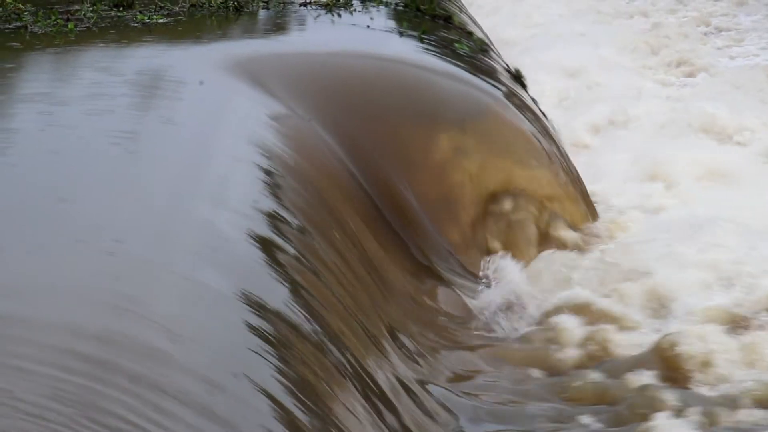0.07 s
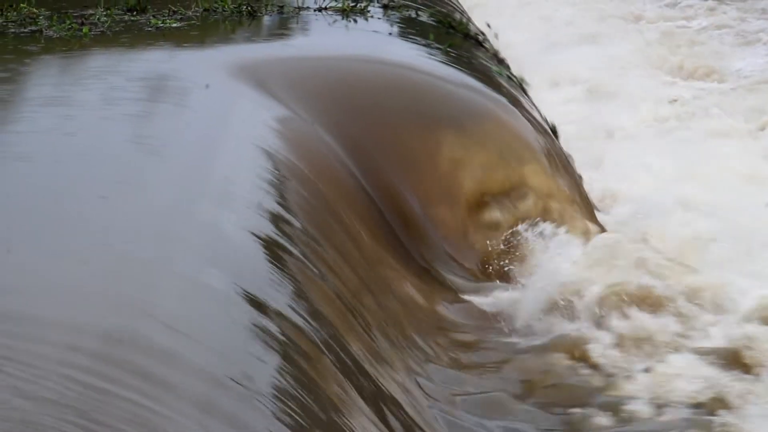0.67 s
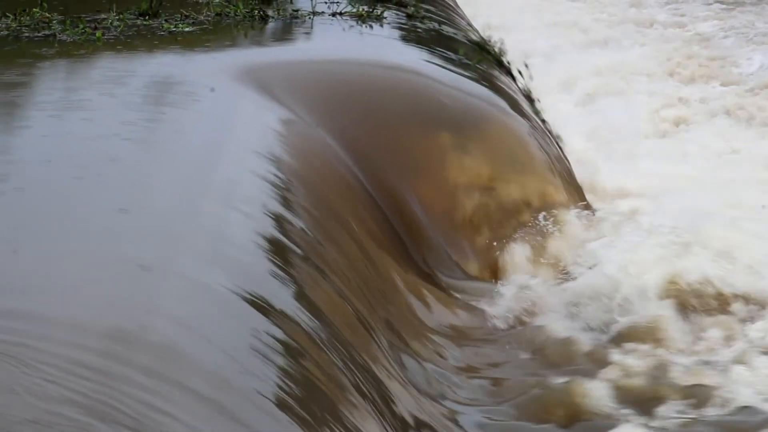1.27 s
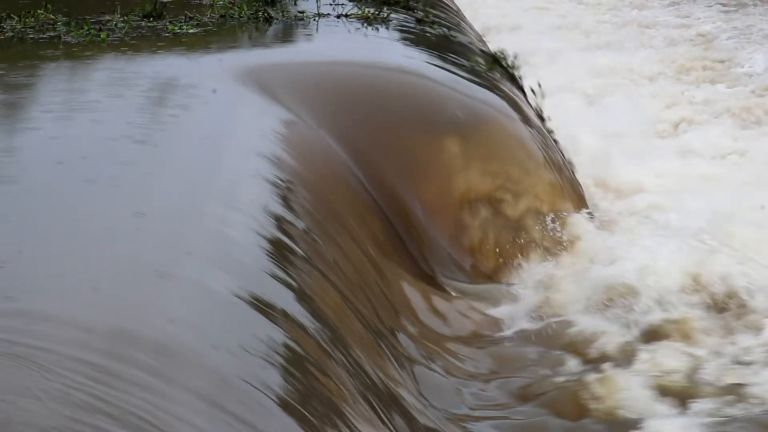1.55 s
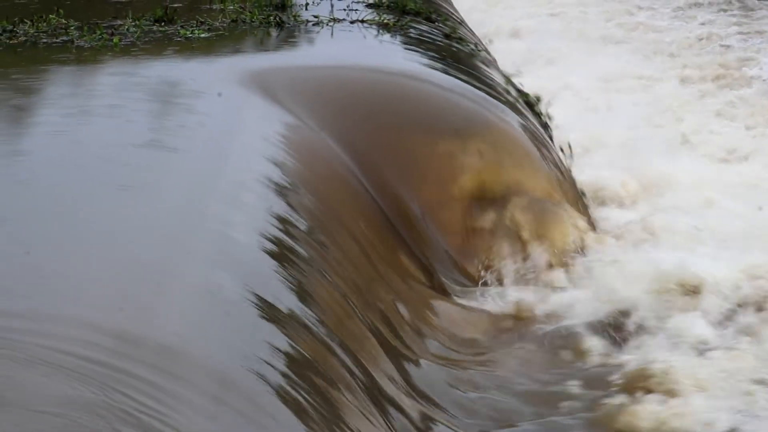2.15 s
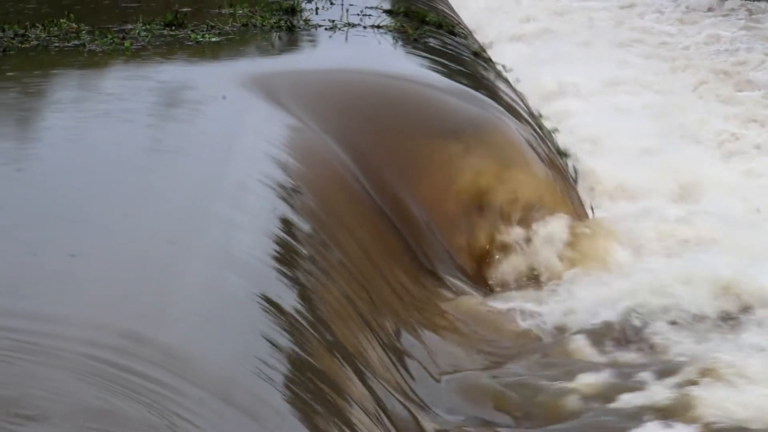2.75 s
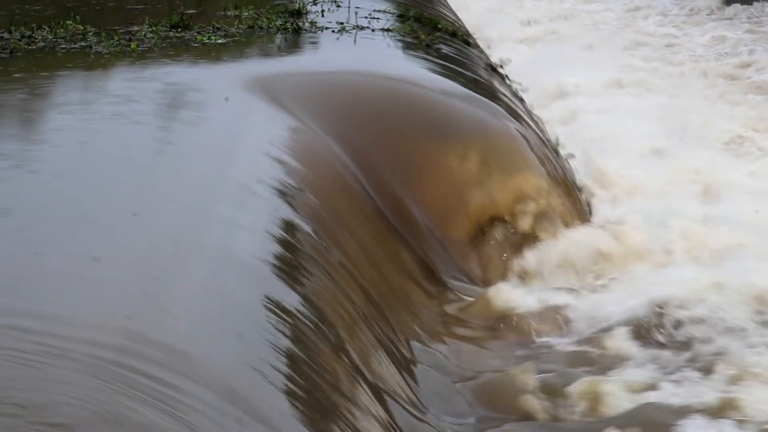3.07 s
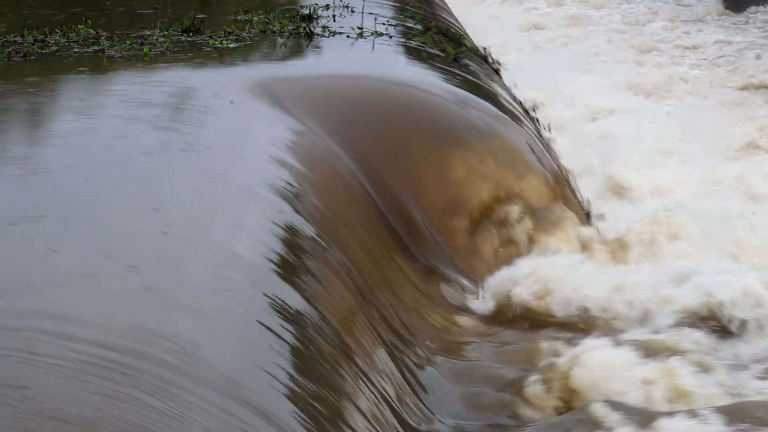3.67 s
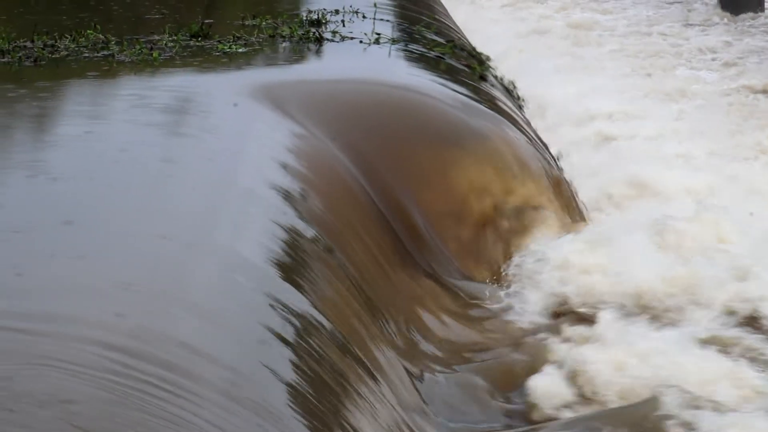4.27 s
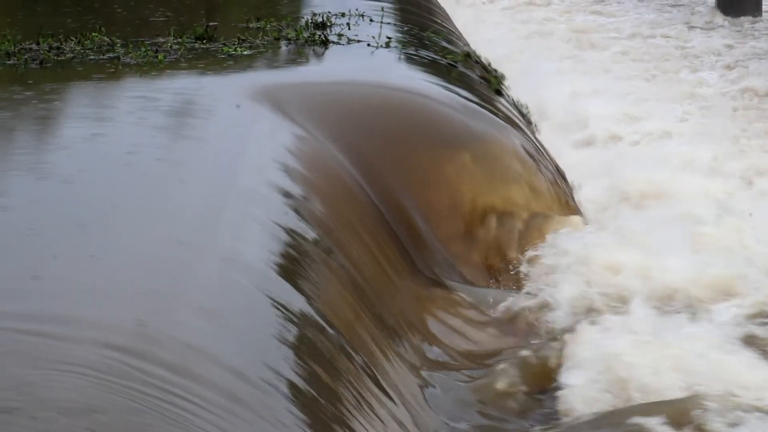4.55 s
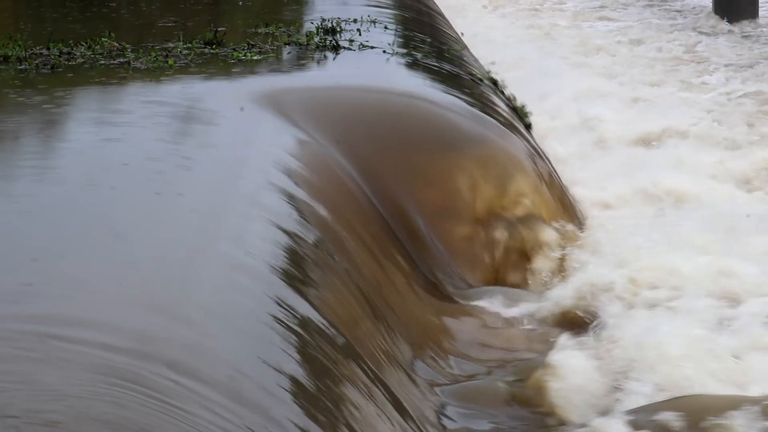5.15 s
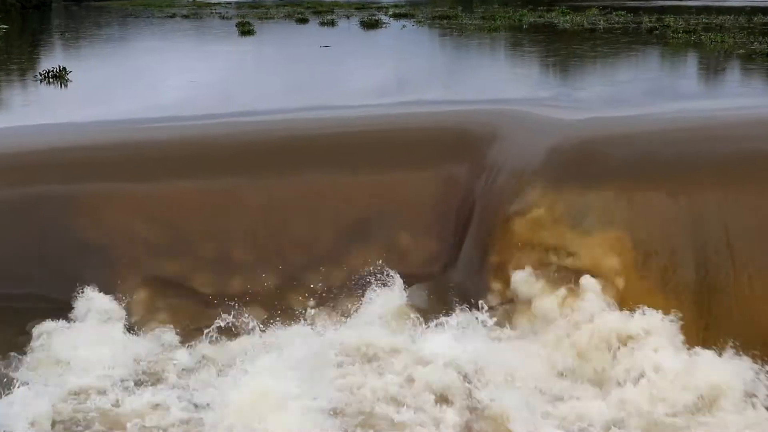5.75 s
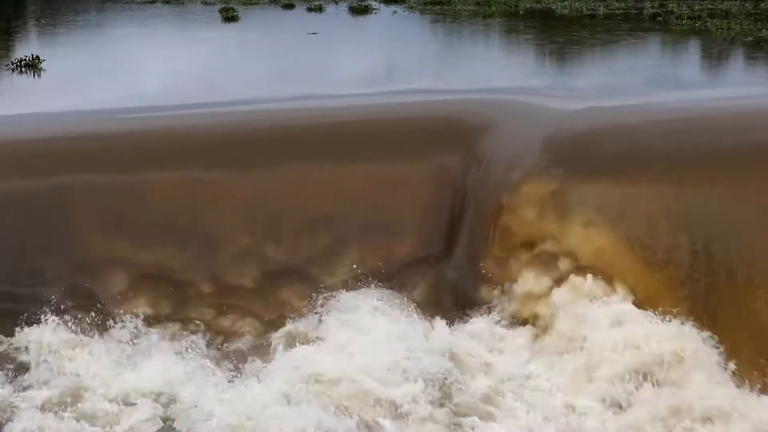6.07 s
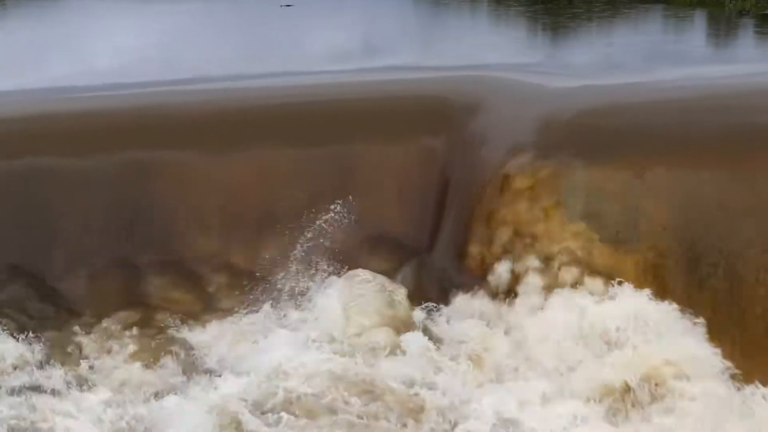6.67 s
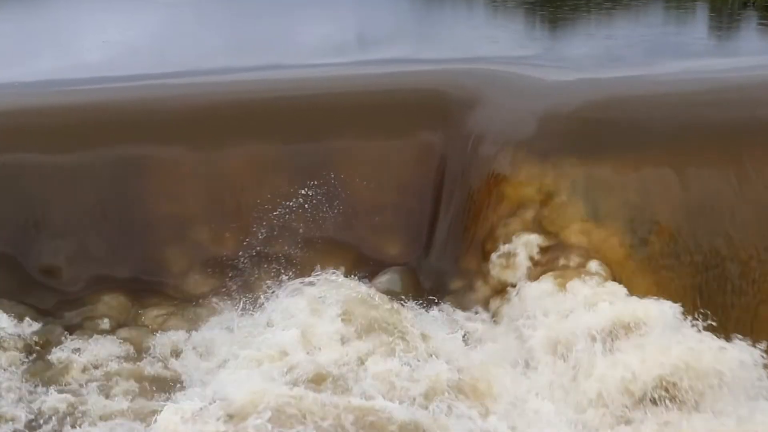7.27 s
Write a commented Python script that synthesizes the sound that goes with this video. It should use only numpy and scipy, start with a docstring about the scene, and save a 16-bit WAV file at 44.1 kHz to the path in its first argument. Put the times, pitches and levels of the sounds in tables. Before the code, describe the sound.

Deep, muffled rushing of water plunging over a weir, throbbing and glugging, turning a little brighter after a tiny tick.

```python
"""A river in flood slides over a weir and plunges into white water, heard muffled from the bank.
Clouds of trapped air throb, thud and glug in the pool, countless bubbles ring in the churn,
and foam fizzes on top. At five and a half seconds, with a small tick, the perspective cuts
from beside the weir to facing the fall, where the foam is brighter."""
import sys
import numpy as np
from scipy import signal
from scipy.fft import rfft, irfft
from scipy.io import wavfile
from scipy.ndimage import uniform_filter1d

SR = 44100
rng = np.random.default_rng(int(sys.argv[2]) if len(sys.argv) > 2 else 0)


def bounce(signal):
    """Save signal as a 16-bit WAV file at the path given by the first command-line argument."""
    frames = np.transpose(np.atleast_2d(signal))
    limited = np.clip(frames, -1, 1)
    pcm = np.round(limited * 32767).astype(np.int16)
    wavfile.write(sys.argv[1], SR, pcm)


N = 327217
TIME = np.arange(N) / SR
FREQS = np.maximum(np.arange(N // 2 + 1) * SR / N, 1)

# Tone and stereo width of the water from each spot, before its four bands are levelled:
# frequency_hz, right_gain_db, left_minus_right_db, likeness (0 wide, 1 mono)
TONE_BESIDE = [(20, -3.6, -0.1, 1), (45, 0.0, 0.5, 0.995), (88, -7.2, -0.7, 0.95), (140, -9.2, -1.6, 0.92),
               (195, -11.3, -1.9, 0.83), (350, -9.3, -4.5, 0.72), (560, -10.8, -8.0, 0.57),
               (830, -16.7, -4.4, 0.55), (1010, -22.0, -5.2, 0.43), (1270, -18.9, -5.1, 0.27),
               (1850, -18.5, -7.6, 0.12), (2330, -23.1, -7.6, 0.11), (2560, -21.4, -11.3, 0.1),
               (3050, -25.7, -13.8, 0.08), (3500, -37.6, -7.6, 0.06), (4000, -53.6, 0.3, 0.04)]
TONE_FACING = [(20, -3.6, 0.2, 1), (55, 0.0, 0.2, 0.99), (95, -3.9, 0.5, 0.84), (190, -4.9, -2.2, 0.61),
               (380, -6.4, -4.4, 0.49), (600, -7.0, -8.2, 0.46), (880, -12.7, -6.2, 0.24),
               (1090, -18.0, -7.0, 0.13), (1320, -12.4, -8.6, 0.15), (1900, -13.8, -6.8, 0.15),
               (2350, -18.2, -6.5, 0.03), (2660, -17.6, -9.9, 0.03), (3100, -22.3, -10.8, 0.03),
               (3550, -30.0, -7.5, 0.07), (4200, -45.0, -1.4, 0.06)]
# Resonances of the air-filled pool from each spot: pitch_hz, width_hz, boost_db
POOL_RINGS_BESIDE = [(111, 24, 5), (135.5, 18, 2.5), (156, 19, 6), (224.7, 30, 3.5), (249.4, 24, 7),
                     (305.4, 21, 3.5), (387, 24, 0.6), (477, 28, 0.4), (676, 34, 1.2)]
POOL_RINGS_FACING = [(135, 30, .9), (214, 38, 3.1), (288, 67, 4), (430, 49, 1.2), (550, 38, 1.4),
                     (614, 50, 1.2), (730, 50, 1.6)]
# Vigour of the flood, riding all four bands of the water: time_s, swell_db
FLOOD_VIGOUR = [(0.0, 0.3), (0.4, 1), (0.68, 1.7), (1.2, 0.36), (1.5, 0.5), (2.0, 0.0), (2.75, 0.4),
                (3.25, 0.25), (3.42, -0.9), (3.65, 1), (4.12, 0.3), (4.38, -0.7), (4.72, 0), (5.05, -0.5),
                (5.35, 0), (5.85, -0.86), (6.35, 0.0), (7.42, 0.04)]
# Big air clouds collapsing in the pool: time_s, rumble_swell_db, boom_swell_db, churn_swell_db
AIR_COLLAPSES = [(0.12, 3, 4, 1.5), (0.32, 4.5, -2, 0), (0.91, 1.5, 2.5, -0.5), (1.14, 4.5, 2.5, 0),
                 (1.61, 0, 3, -1), (1.835, 5.5, 7.5, 0), (2.11, -0.5, 3.5, -0.5), (2.29, 4, 5.5, -0.5),
                 (2.62, 2.5, 4.5, 0.5), (2.91, -1, 2, 0.5), (2.975, 2, 5, 0), (3.073, 0, 1.5, 0),
                 (3.665, 8.5, 2, 0.5), (3.735, -1, 4, 1.2), (3.985, -1, 5, -1.5), (4.055, 0, 4, 1),
                 (4.155, 4.5, 2, 2), (4.48, 2, 1, 0.5), (4.645, 0, 1.5, -0.5), (4.735, 4.5, 1, -0.5),
                 (4.85, 4, 3.5, -0.5), (5.26, 1, 1.5, 0.5), (5.34, 0.5, 2, 1), (5.46, -3, 2.5, 1),
                 (5.55, 6.5, 1, 0), (5.74, 7, 2.5, 1), (6.416, 4, -1.5, 0.7), (6.565, -1, 2.5, -0.5),
                 (6.65, 5.5, 5, 0.5), (7.085, 7, 1.5, -1)]
# Large air pockets pinching off: start_s, pitch_hz, level_db
AIR_POCKETS = [(0.22, 258, -19), (0.3, 312.6, -21.5), (0.605, 363, -23.5), (0.695, 600, -28),
               (0.721, 244.5, -21), (0.893, 302, -20), (1.03, 328, -23), (1.572, 245, -23),
               (1.735, 662, -28.5), (1.785, 233.5, -21.5), (2.292, 322, -21), (2.46, 254, -20.5),
               (2.6, 468, -27), (2.66, 247.5, -24), (3.045, 230, -19), (3.07, 440, -25),
               (3.186, 311.5, -22), (3.605, 506, -27.5), (3.7, 305, -23), (4.028, 245.5, -22.5),
               (4.121, 367.4, -23.5), (4.446, 578, -27), (4.55, 610, -28), (5.311, 664, -28.5),
               (7.25, 271, -20)]
# Colour of the tick: pitch_hz, width_hz, gain_db
TICK_COLOUR = [(1573, 1500, 13), (6200, 1400, 4)]

BEND_MS, BEND_HZ = 0.46, 333   # long waves bend round the microphone and reach the left later still
THUD_WIDTH_S, LULL_AFTER_S, LULL_SHARE = 0.028, 0.057, 0.54
THROB_FOLLOWS, CHURN_FOLLOWS, FOAM_FOLLOWS = 0.58, 1.15, 0.99   # dB of swell per dB of flood vigour
GLUG_ATTACK_S, GLUG_RISE_PER_S, GLUG_LEFT_DB = 0.018, 0.33, -5   # the rise is a share of the pitch
LAG_BESIDE_MS, LAG_FACING_MS = 0.21, 0.65   # the left side hears the water later
CUT_S, CROSSFADE_S = 5.4932, 0.002   # from beside the weir to facing it


def from_db(db):
    """Decibels to gain."""
    return 10 ** (np.asarray(db) / 20)


def unit_rms(x):
    """Scale to an rms of 1."""
    return x / np.sqrt(np.mean(x ** 2) + 1e-20)


def below(hz, order=8):
    """Smooth crossover: 1 well under hz, 0 well above."""
    return 1 / (1 + (FREQS / hz) ** (2 * order))


def bubble_ring(clicks, hz, t60_s):
    """Each click sets a bubble ringing: a sine that dies by 60 dB in t60_s."""
    decay = from_db(-60 / (t60_s * SR))
    step = 2 * np.pi * hz / SR
    return signal.lfilter([0, np.sin(step)], [1, -2 * decay * np.cos(step), decay ** 2], clicks + 1e-18)


def bubbles(per_s, ring_cycles, spread_db):
    """Bubbles pinch off at random and ring briefly, mostly faint; small high ones outnumber large ones."""
    out = np.zeros(N)
    pitches_hz = np.geomspace(280, 3700, 28)
    for hz in pitches_hz:
        count = max(1, int(per_s * N / SR * hz / pitches_hz.sum()))
        when, strength, polarity = rng.random((count, 3)).T
        strength_db = spread_db * np.minimum(-np.log(1 - strength), 4)
        clicks = np.zeros(N)
        clicks[(when * N).astype(int)] = from_db(strength_db) * np.sign(polarity - 0.5)
        out += np.sqrt(hz) * unit_rms(bubble_ring(clicks, hz, ring_cycles / hz))
    return unit_rms(out)


def white_water(bubble_db):
    """Spectrum of the bed: a smooth rush of far turbulence with nearer bubbles poking through."""
    near = bubbles(per_s=5000, ring_cycles=18.6, spread_db=3.0)
    rush = rng.standard_normal(N)
    return rfft(rush + from_db(bubble_db) * near)


def water_from_bank(tone, pool_rings, lag_ms, muffle_hz, bubble_db):
    """Stereo spectrum at one spot: centred bass, ringing pool, wide foam; the left is shaded and late."""
    tone_hz, *columns = np.transpose(tone)
    gain_db, shade_db, likeness = [np.interp(np.log(FREQS), np.log(tone_hz), c) for c in columns]
    for hz, width_hz, boost_db in pool_rings:
        gain_db += boost_db / (1 + (2 * (FREQS - hz) / width_hz) ** 2)
    right, wide = white_water(bubble_db), white_water(bubble_db)
    delay_ms = lag_ms + BEND_MS * below(BEND_HZ, order=1)
    late = right * np.exp(-2j * np.pi * FREQS * delay_ms / 1000)
    left = from_db(shade_db) * (likeness * late + np.sqrt(1 - likeness ** 2) * wide)
    passband = below(muffle_hz, order=100) - below(hz=10, order=2)
    return np.array([left, right]) * from_db(gain_db) * passband


def heave(fastest_hz, depth_db):
    """The pool heaves at random: a slow level wobble of depth_db rms."""
    slow_band = below(fastest_hz, order=2) * (1 - below(hz=1.0, order=2))
    return depth_db * unit_rms(irfft(rfft(rng.standard_normal(N)) * slow_band, N))


def surge(spectrum, level_db, even_s):
    """One band of water, evened out over even_s, swells and sinks along the level_db curve."""
    band = irfft(spectrum, N)
    power = np.mean(band, axis=0) ** 2
    for _ in range(2):
        power = uniform_filter1d(power, int(even_s * SR))
    return band / np.sqrt(power + 1e-20) * from_db(level_db)


def weir(water, rumble_db, boom_db, churn_db, foam_db):
    """The biggest air clouds rumble, smaller ones boom, the churn rolls above, the foam barely moves."""
    sub, bass, body = below(hz=85), below(hz=175), below(hz=900)
    flow_db = np.interp(TIME, *np.transpose(FLOOD_VIGOUR))
    throb_db = THROB_FOLLOWS * flow_db + heave(fastest_hz=8, depth_db=0.4)
    rumble_thuds, boom_thuds, churn_thuds = thuds()
    rumble = surge(water * sub, rumble_db + throb_db + rumble_thuds, even_s=0.13)
    boom = surge(water * (bass - sub), boom_db + throb_db + boom_thuds, even_s=0.13)
    churn = surge(water * (body - bass), churn_db + CHURN_FOLLOWS * flow_db + churn_thuds, even_s=0.15)
    foam = surge(water * (1 - body), foam_db + FOAM_FOLLOWS * flow_db, even_s=0.3)
    return rumble + boom + churn + foam


def thuds():
    """Air clouds collapse, each a bump and a short lull: fader rides in dB for rumble, boom and churn."""
    rides_db = np.zeros((3, N))
    for time_s, *swells_db in AIR_COLLAPSES:
        bump = np.exp(-0.5 * ((TIME - time_s) / THUD_WIDTH_S) ** 2)
        lull = np.exp(-0.5 * ((TIME - time_s - LULL_AFTER_S) / THUD_WIDTH_S) ** 2)
        rides_db += np.outer(swells_db, bump - LULL_SHARE * lull)
    return rides_db


def glugs():
    """Large air pockets pinch off and ring hollow, bending up in pitch as they near the surface."""
    right = np.zeros(N)
    for start_s, pitch_hz, level_db in AIR_POCKETS:
        start = int(start_s * SR)
        age_s = TIME[:min(N - start, SR // 2)]
        envelope = age_s / GLUG_ATTACK_S * np.exp(1 - age_s / GLUG_ATTACK_S)
        glide_hz = pitch_hz * (1 + GLUG_RISE_PER_S * (age_s - GLUG_ATTACK_S))
        phase = 2 * np.pi * (np.cumsum(glide_hz) / SR + rng.random())
        right[start:start + len(age_s)] += from_db(level_db) * envelope * np.sin(phase)
    left = from_db(GLUG_LEFT_DB) * np.interp(TIME - LAG_BESIDE_MS / 1000, TIME, right)
    return np.array([left, right])


def tick(gain_db, length_s):
    """A tiny dry snap with a bright edge, panned right."""
    gate = np.abs(TIME - CUT_S) < length_s / 2
    burst = unit_rms(rng.standard_normal(N)) * gate + 1e-18
    burst = signal.sosfilt(signal.butter(1, 7500, fs=SR, output="sos"), burst)
    ringing = np.zeros(N)
    for hz, width_hz, ring_db in TICK_COLOUR:
        resonance = signal.iirpeak(hz, hz / width_hz, fs=SR)
        ringing += from_db(ring_db) * signal.lfilter(*resonance, burst)
    pan = from_db([[-3], [3]])
    return from_db(gain_db) * (burst + ringing) * pan


def scene():
    """The weir from beside, then head-on and brighter; glugs run throughout and a tick lands on the cut."""
    side = water_from_bank(TONE_BESIDE, POOL_RINGS_BESIDE, LAG_BESIDE_MS, muffle_hz=4010, bubble_db=-13)
    front = water_from_bank(TONE_FACING, POOL_RINGS_FACING, LAG_FACING_MS,
                            muffle_hz=4220, bubble_db=-12.5)
    beside = weir(side, rumble_db=-23.5, boom_db=-26.5, churn_db=-25.5, foam_db=-33.0)
    facing = weir(front, rumble_db=-26.5, boom_db=-29.0, churn_db=-26.5, foam_db=-29.5)
    crossfade = np.clip((TIME - CUT_S) / CROSSFADE_S + 0.5, 0, 1)
    water = (1 - crossfade) * beside + crossfade * facing
    return water + glugs() + tick(gain_db=-27.0, length_s=0.0018)


def record(dry):
    """A quick fade at each end, and the very top rolled off."""
    fade_s, cutoff_hz = 0.004, 17500
    from_edge_s = np.minimum(TIME, TIME[-1] - TIME)
    fade = np.sin(np.pi / 2 * np.clip(from_edge_s / fade_s, 0, 1)) ** 2
    high_cut = signal.cheby2(12, 70, cutoff_hz, fs=SR, output="sos")
    return signal.sosfilt(high_cut, dry * fade)


dry = scene()
out = record(dry)
bounce(out)
```